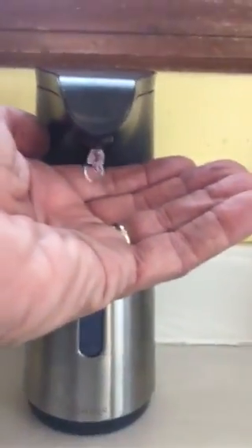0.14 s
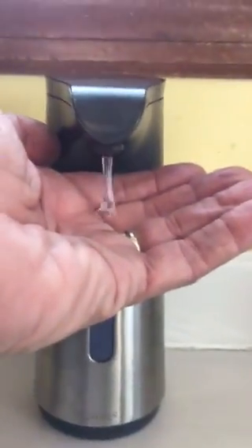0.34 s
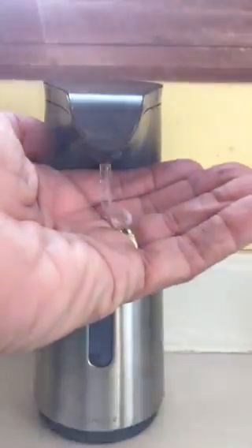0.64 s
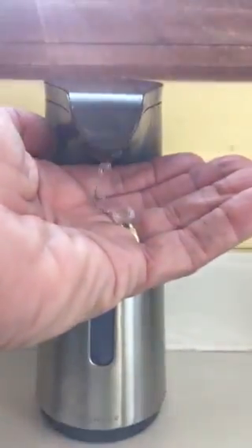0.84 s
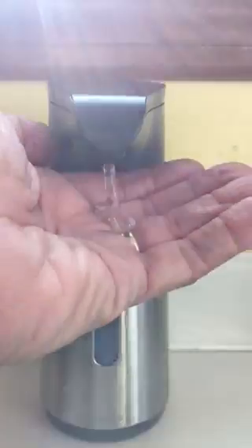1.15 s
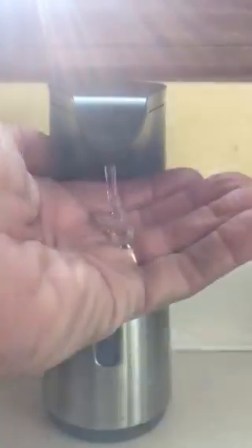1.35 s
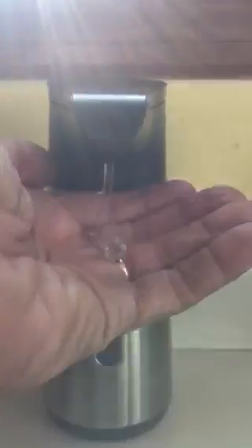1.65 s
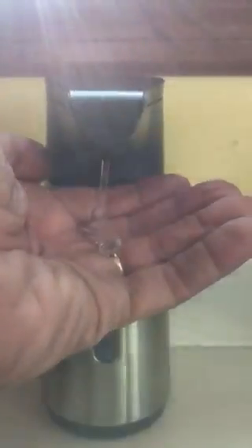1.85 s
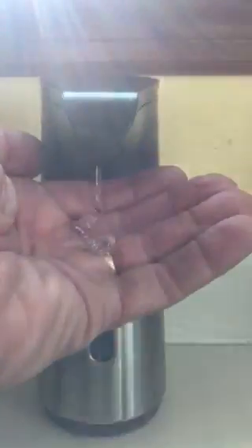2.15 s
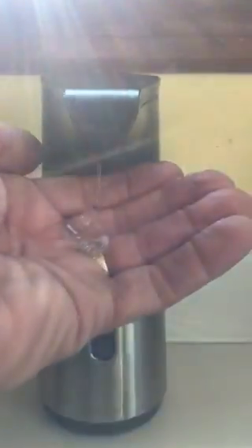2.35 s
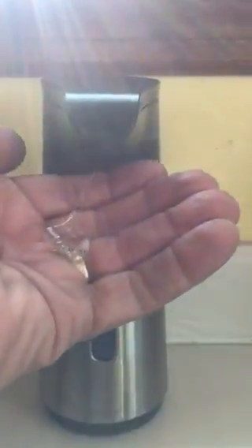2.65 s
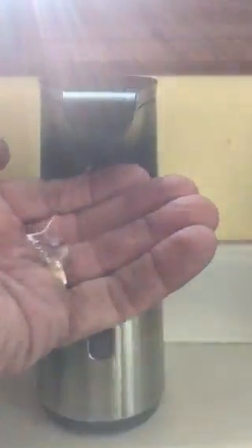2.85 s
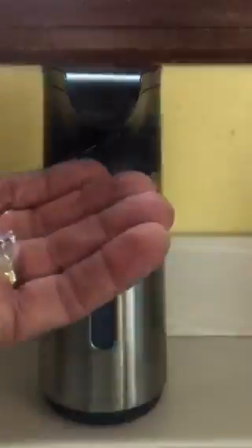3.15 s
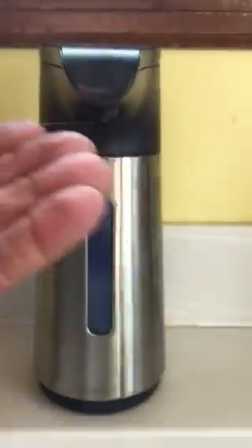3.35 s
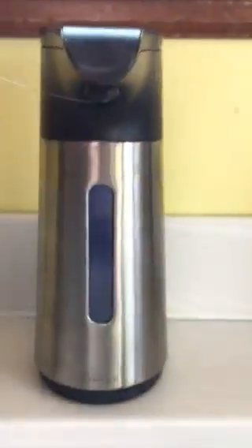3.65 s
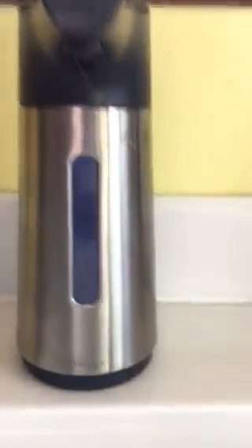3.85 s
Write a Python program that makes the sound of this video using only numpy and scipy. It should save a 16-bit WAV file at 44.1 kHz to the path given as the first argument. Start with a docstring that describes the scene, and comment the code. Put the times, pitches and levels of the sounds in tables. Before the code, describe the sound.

A touchless soap dispenser's small motor whirs close by from the start, with rapid, pulsing gear knocks and tiny nozzle squeaks. At about 1.7 seconds it pauses, then runs back with soft glugs and plastic clicks, stopping with a short chirp near 2.2 seconds. Faint hand brushes follow, with a last click at 2.6 and two soft bumps around 3.4 seconds, over a quiet room's low hum.

```python
"""A touchless soap dispenser pumps gel into a palm, close by in a quiet room.
First its small motor hums and whines while the gears knock the housing eight times per pump turn,
hardest on the stroke, and air squeaks in the nozzle. The motor pauses, then runs back briefly:
gel glugs back into the tube, the plastic parts click and the gears brake with a chirp. As the hand
draws away come faint brushes, a last click and two soft bumps. A faint hiss swells at the very end."""
import sys
import numpy as np
from scipy import signal
from scipy.fft import rfft, irfft
from scipy.io import wavfile
from scipy.ndimage import uniform_filter1d

SR = 44100
rng = np.random.default_rng(int(sys.argv[2]) if len(sys.argv) > 2 else 0)


def master(y):
    """Save y as 16-bit WAV."""
    cut = np.clip(np.atleast_2d(y).T, -1, 1)
    pcm = np.round(cut * 32767)  # scale
    wavfile.write(sys.argv[1], SR, pcm.astype(np.int16))


N = 176400


def undb(db):
    """Turn decibels into a number to multiply by."""
    return 10 ** (np.asarray(db) / 20)


def unit(x):
    """Scale a signal to an average (rms) size of 1."""
    return x / np.sqrt(np.mean(x ** 2))


def clock():
    """The time of each sample, in seconds."""
    return np.arange(N) / SR


def fade(t, fade_s):
    """Silent before t = 0, then dying away by 60 dB every fade_s seconds."""
    return (t >= 0) * np.exp(-np.log(1000) * np.maximum(t, 0) / fade_s)


def swell(t, length_s):
    """A smooth rise and fall, starting at t = 0."""
    return np.sin(np.pi * np.clip(t / length_s, 0, 1)) ** 2


def noise(colour):
    """Noise of average size 1; rows of (pitch_hz, level_db) balance its lows and highs."""
    hz, db = np.array(sorted(colour)).T
    freqs = np.maximum(np.fft.rfftfreq(N, 1 / SR), 1)
    gains = undb(np.interp(np.log(freqs), np.log(hz), db))
    return unit(irfft(rfft(rng.standard_normal(N)) * gains, N))


def wander(rate_hz):
    """A smooth random drift of average size 1."""
    width = max(int(SR / rate_hz), 1)
    return unit(uniform_filter1d(uniform_filter1d(rng.standard_normal(N), width), width))


def through(x, response):
    """Let every sample of x set off a ring or an echo."""
    return signal.fftconvolve(x, response)[:N]


def blows(rows):
    """One instant tap for each row of (start_s, level_db)."""
    taps = np.zeros(N)
    for start_s, db in rows:
        taps[int(np.clip(start_s * SR, 0, N - 1))] += undb(db)
    return taps


def ring(tones, contact_s=0, wave=np.cos):
    """A struck object rings with several fading tones; a longer contact sounds duller."""
    t = clock()[:N // 8]
    sound = sum(undb(db) * wave(2 * np.pi * hz * t) * fade(t, fade_s) for hz, db, fade_s in tones)
    if contact_s:
        sound = signal.fftconvolve(sound, swell(t, contact_s))[:len(t)]
    return -sound / np.abs(sound).max()


# Colour of the room's background noise: pitch_hz, relative_level_db
ROOM_COLOUR = [(12, -44), (20, -1.5), (110, -1.5), (163, -10.5), (262, -14.5), (293, -18), (472, -24.5),
               (513, -24.5), (698, -24.5), (780, -27.5), (976, -29), (1960, -35), (2460, -33.5),
               (2820, -38.5), (3740, -40), (13200, -45.5), (16000, -44)]

def quiet_room():
    """A low rumble and the hum of mains electricity, there all the time."""
    rumble_db, mains_db, mains_hz = -59, -67.5, 122.5
    mains = np.sqrt(2) * np.sin(2 * np.pi * mains_hz * clock())
    return undb(rumble_db) * noise(ROOM_COLOUR) + undb(mains_db) * mains


# The stroke of each pump turn, when the gears knock hardest: time_s
PUMP_STROKES = [.1150, 0.3286, 0.5428, 0.7583, .9738, 1.1891, 1.4047, 1.6205]
# Motor speed on the backward run: time_s, speed_hz
BACK_SPEED = [(1.71, 139), (1.78, 159.8), (1.85, 159), (1.93, 151.9), (2.2, 147.3)]
# How loud the motor hums: time_s, level_db
HUM_LEVELS = [(0, -61), (.4, -58.5), (.8, -55), (1.66, -54), (1.75, -65), (2.1, -66), (2.2, -59)]
# Colour of the whirr of motor brushes and gears, forward and backward: pitch_hz, relative_level_db
FORWARD_WHIRR = [(200, -10), (480, -6), (620, -3.5), (950, 1.5), (1200, -6), (1500, -8), (1900, -6),
                 (2450, -7.5), (2950, -22), (4200, -20.5), (4950, -32), (7200, -26.5), (8500, -25),
                 (12200, -28), (13500, -51), (16000, -47)]
BACK_WHIRR = [(200, -17), (350, -7), (480, -12), (620, 1.5), (900, 2), (1170, 5), (1550, -11), (2150, -5.5),
              (2900, -21), (4100, -21), (4900, -29), (7300, -21), (10000, -25.5), (13500, -37),
              (16000, -40)]
# Ringing tones of the motor's metal shell: pitch_hz, width_hz, relative_level_db
SHELL_TONES = [(3670, 124, 13.5), (5414, 113, -3), (6960, 130, -4.5), (12200, 450, -11)]
PAUSE_S, BACK_S, STOP_S = 1.655, 1.709, 2.235

def motor():
    """The shaft hums, the gears whine and whirr, and the shell rings: forward, then backward."""
    t = clock()
    run_up_s, run_down_s = 0.0067, 0.048
    forward = np.clip(1 - (t - PAUSE_S) / run_down_s, 0, 1) ** 2
    back = np.clip((t - BACK_S) / run_up_s, 0, 1) * np.clip(1 - (t - STOP_S) / run_down_s, 0, 1) ** 2

    # Going forward, the speed swings once per pump turn and peaks just before the stroke.
    forward_hz, swing, lead_s = 140, 0.0391, 0.007
    turn_s = np.mean(np.diff(PUMP_STROKES[1:]))
    stroke = np.cos(2 * np.pi * (t - PUMP_STROKES[-1] + lead_s) / turn_s)
    back_hz = np.interp(t, *np.array(BACK_SPEED).T)
    speed_hz = np.where(t < BACK_S, forward_hz * (1 + swing * stroke), back_hz)
    shaft_angle = 2 * np.pi * np.cumsum(speed_hz * (1 + 0.0039 * wander(61))) / SR

    hum_db = np.interp(t, *np.array(HUM_LEVELS).T) + wander(60)
    hum_on = np.clip((STOP_S - t) / run_down_s + 1, 0, 1)
    hum = np.sqrt(2) * np.sin(shaft_angle) * undb(hum_db) * hum_on

    gear_teeth = 12
    forward_whine = undb(-59) * forward * np.sin(gear_teeth * shaft_angle)
    back_whine = undb(-66) * back * (np.sin(gear_teeth * shaft_angle) + np.sin(14 * shaft_angle))
    whine = unit(undb(3.6 * wander(80))) * (forward_whine + back_whine)

    pulsing = unit(1 + 0.12 * np.cos(shaft_angle))
    loaded = forward * undb(-0.5 * stroke)  # a little quieter on each stroke
    forward_whirr = undb(-55.5) * loaded * noise(FORWARD_WHIRR)
    back_whirr = undb(-52 - 7.5 * (t - BACK_S)) * back * noise(BACK_WHIRR)
    whirr = pulsing * (forward_whirr + back_whirr)

    rattle = rng.standard_normal(N) * pulsing * undb(4 * wander(300))
    shell = unit(sum(undb(db) * signal.lfilter(*signal.iirpeak(hz, hz / width_hz, fs=SR), rattle)
                     for hz, width_hz, db in SHELL_TONES))
    return hum + whine + whirr + shell * (undb(-62) * loaded + undb(-68.5) * back)


# The eight gear knocks of one pump turn: time_from_stroke_s, relative_level_db
TURN_KNOCKS = [(-.1063, -2), (-.0786, -1.5), (-.0519, 1.5), (-.0257, 3), (0, 4), (.0255, 0), (.0527, -0.5),
               (.0807, -5)]
# Gear knocks of the backward run: start_s, relative_level_db
BACK_KNOCKS = [(1.7939, 1.5), (1.8178, 2), (1.8415, 1), (1.8657, 1), (1.8902, 0), (1.9150, -11),
               (1.9400, -6)]
# Ringing tones of the housing: pitch_hz, relative_level_db, fade_s
HOUSING_TONES = [(340, -17, .09), (434, -19.5, .09), (621, -7, 0.086), (630.2, -3.5, 0.06),
                 (685, -14.5, 0.14), (780, -8.5, .07), (816, -2.5, 0.098), (1078, 2, 0.028),
                 (1147.4, 4, 0.019), (1364, -3.5, 0.057), (1715, -8.5, 0.033), (2010, -4, 0.046),
                 (2120, -12.5, 0.05), (2600, -11.5, 0.026)]

def gear_knocks():
    """Each gear tooth touches lightly, then knocks and makes the housing ring."""
    contact_s, touch_lead_s = 0.00062, 0.00172
    knocks = [(stroke_s + offset_s, db) for stroke_s in PUMP_STROKES for offset_s, db in TURN_KNOCKS
              if stroke_s + offset_s < PAUSE_S] + list(BACK_KNOCKS)
    force, t = np.zeros(N), np.arange(128) / SR
    for knock_s, db in knocks:
        push = swell(t, contact_s * (1 - .02 * db))  # weaker knocks push for longer
        knock = (knock_s, db + 0.37 * rng.standard_normal())
        touch = (knock_s - touch_lead_s, db - 12 + rng.standard_normal())
        for peak_s, push_db in knock, touch:
            first = max(int(peak_s * SR) - np.argmax(push), 0)
            force[first:first + len(t)] += undb(push_db) * push / push.sum()
    return undb(-25) * through(force, ring(HOUSING_TONES))


# Air squeaking through the gel: start_s, middle_pitch_hz, length_s, level_db, fizz_vs_squeak_db
SQUEAKS = [(0.018, 5800, .016, -57.5, 0.5), (.034, 13500, 0.0089, -53, -3), (.089, 8700, 0.0078, -60, -8),
           (0.254, 2200, 0.0045, -42, -29), (0.278, 8600, 0.0094, -52.5, -3), (0.28, 5700, 0.018, -47, -7),
           (0.422, 7000, 0.013, -59, -7), (0.442, 3750, 0.0098, -42.5, -22),
           (0.737, 3800, 0.0089, -37.5, -18), (0.7375, 4700, 0.0039, -44.5, -11),
           (0.768, 9400, 0.0045, -58, 2), (1.516, 4400, 0.0093, -56.5, 4), (1.765, 2320, 0.011, -41, -44),
           (2.040, 13400, 0.041, -65, -7), (2.191, 5000, 0.0046, -50, 0.5),
           (2.253, 13500, 0.0035, -66, -17)]
# Colour of the fizz: pitch_hz, relative_level_db
FIZZ_COLOUR = [(1500, -57), (4500, 2.5), (9000, -6), (16000, -14)]

def nozzle_squeaks():
    """Tiny air pockets in the nozzle fizz and squeak, each with a wobbly, falling pitch."""
    t, sound, fizz = clock(), np.zeros(N), noise(FIZZ_COLOUR)
    wobble = 1 + 0.0713 * wander(2500)
    for start_s, hz, length_s, db, fizz_db in SQUEAKS:
        progress = np.clip((t - start_s) / length_s, 0, 1)
        pitch_hz = hz * wobble * (1 - .35 * (progress - .5))
        squeak = np.sin(2 * np.pi * np.cumsum(pitch_hz) / SR)
        sound += undb(db) * swell(t - start_s, length_s) * (squeak + undb(fizz_db) * fizz)
    return sound


# Sharp clicks of the moving parts: start_s, relative_ring_db, relative_crack_db
CLICKS = [(1.7111, -19, -31), (1.9817, -13, -7.5), (2.1434, -9, -3.5), (2.1689, -4.5, -1.5),
          (2.196, -6, 2.5), (2.5565, -9.5, -15.5)]
# Ringing tones of a click: pitch_hz, relative_level_db, fade_s
CLICK_TONES = [(127.5, -19, 0.23), (361.8, -10.5, 0.15), (593, -13.5, 0.083), (1146, -0.5, 0.039),
               (1267, -11, 0.044), (2080, -2.5, 0.011), (2330, -2, .016), (3560, -6.5, 0.022),
               (5470, -15.5, 0.038), (9100, -34, 0.027)]
# Colour of a click's crack: pitch_hz, relative_level_db
CRACK_COLOUR = [(500, 2), (1500, 0), (2200, 11.5), (3000, -10), (3900, 0.5), (4900, -20), (6500, -16),
                (9500, -5), (12000, -15), (16000, -20)]

def plastic_clicks():
    """Hard plastic parts meet: a short ring, and a crack that builds and dies in milliseconds."""
    crack_lag_s, crack_rise_s = 0.00057, 0.0013
    t, bursts = clock(), np.zeros(N)
    taps = blows([(start_s, ring_db) for start_s, ring_db, _ in CLICKS])
    ringing = through(taps, ring(CLICK_TONES, contact_s=.0001, wave=np.sin))
    for start_s, _, crack_db in CLICKS:
        age = t - start_s - crack_lag_s
        rise = np.clip(age / crack_rise_s + 1, 0, 1)
        since_peak = np.maximum(age, 0)
        fall = fade(since_peak, 0.015) + undb(-17) * fade(since_peak, 0.023)
        bursts += undb(crack_db) * rise * fall
    return undb(-24) * ringing + undb(-34.5) * bursts * noise(CRACK_COLOUR)


# Low glugs in the tube: start_s, starting_pitch_hz, level_db
GLUGS = [(1.724, 646, -46), (1.732, 346, -46), (1.747, 200, -67), (1.777, 304, -40.5), (1.800, 395, -44),
         (1.814, 233, -50), (1.828, 334, -45.5), (1.843, 423, -46)]

def gel_glugs():
    """Gel is sucked back into the tube; each glug rises in pitch as it fades."""
    fade_s, rise_per_s = 0.036, 6.5
    t, sound = clock(), np.zeros(N)
    for start_s, hz, db in GLUGS:
        age = t - start_s
        phase = 2 * np.pi * hz * age * (1 + rise_per_s * age / 2)
        sound += undb(db) * fade(age, fade_s) * np.sin(phase)
    return sound


# The chirp's tones at 1, 2, 3 and 4 times its pitch: relative_level_db
BRAKE_TONES = [0, -10, -16, -30]

def brake():
    """The gears give a short, rough, falling chirp as the motor stops."""
    start_s, length_s, from_hz, to_hz = 2.2415, .020, 720, 560
    age = clock() - start_s
    pitch_hz = np.interp(age, [0, length_s], [from_hz, to_hz]) * (1 + 0.15 * wander(900))
    phase = 2 * np.pi * np.cumsum(pitch_hz) / SR
    chirp = sum(undb(db) * np.sin(k * phase) for k, db in enumerate(BRAKE_TONES, 1))
    grit = undb(-18.5) * noise(FORWARD_WHIRR)
    return undb(-37) * swell(age, length_s) * (chirp + grit)


# Faint brushes of the hand: start_s, level_db, fade_s
BRUSHES = [(2.334, -61, 0.39), (2.996, -64, 0.12), (3.198, -57, 0.12), (3.57, -69.5, 0.37)]
# Colour of a brush: pitch_hz, relative_level_db
BRUSH_COLOUR = [(200, -3), (1100, 1), (2400, -4), (4000, -31), (9000, -34)]

def hand_brushes():
    """The hand draws away with soft rubs of noise that start suddenly and fade."""
    t = clock()
    loudness = sum(undb(db) * fade(t - start_s, fade_s) for start_s, db, fade_s in BRUSHES)
    return loudness * noise(BRUSH_COLOUR)


# Soft bumps of the hand: start_s, level_db
BUMPS = [(3.3565, -35), (3.4325, -36)]
# Ringing tones of a bump: pitch_hz, relative_level_db, fade_s
BUMP_TONES = [(70, -16, 0.038), (117.6, 3.5, 0.043), (337, 0.5, 0.05), (576, -7.5, 0.037)]

def hand_bumps():
    """Two soft contacts set off a low, dull ring."""
    return through(blows(BUMPS), ring(BUMP_TONES, contact_s=0.0024, wave=np.sin))


# Colour of the closing hiss: pitch_hz, relative_level_db
HISS_COLOUR = [(300, 1), (1000, -4.5), (3500, -11), (9000, -16.5), (16000, -21)]

def closing_hiss():
    """A faint hiss swells at the very end."""
    t, start_s = clock(), 3.77
    return undb(-69) * np.interp(t, [start_s, t[-1]], [0, 1]) * noise(HISS_COLOUR)


def scene():
    """The dispenser with a little echo, and the hand, over the quiet room."""
    echo_db, echo_delay_s, echo_fade_s = -10, .004, 0.21
    dispenser = motor() + gear_knocks() + nozzle_squeaks() + plastic_clicks() + gel_glugs()
    tail = (rng.standard_normal(N) * fade(clock() - echo_delay_s, echo_fade_s))[:N // 4]
    echo = undb(echo_db) * through(dispenser, tail / np.linalg.norm(tail))
    return (quiet_room() + dispenser + echo + brake() + hand_brushes() + hand_bumps() + closing_hiss())[None]


def record(dry):
    """The recorder cuts the deepest bass and the highest treble."""
    lowest_hz, highest_hz = 39, 15800
    bass_cut = signal.butter(4, lowest_hz, "high", fs=SR, output="sos")
    treble_cut = signal.ellip(10, .1, 60, highest_hz, fs=SR, output="sos")
    return signal.sosfilt(treble_cut, signal.sosfilt(bass_cut, dry))


dry = scene()
out = record(dry)
master(out)
```